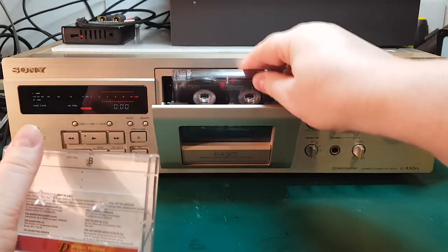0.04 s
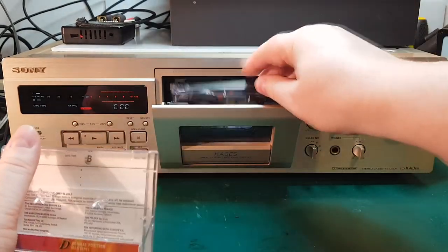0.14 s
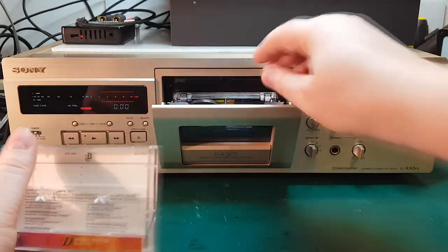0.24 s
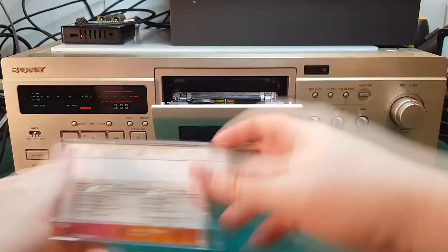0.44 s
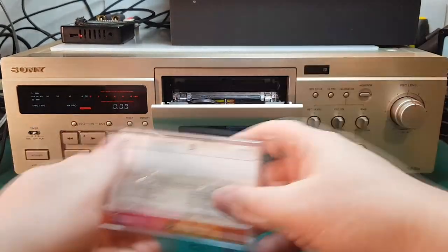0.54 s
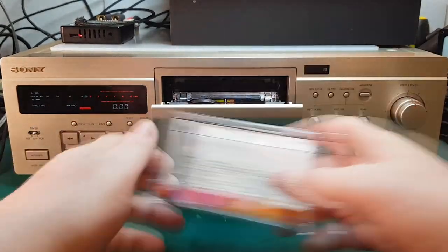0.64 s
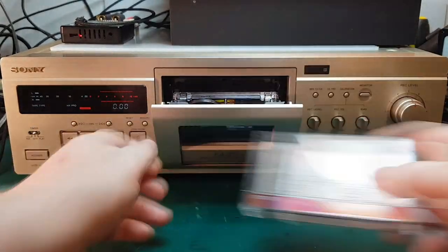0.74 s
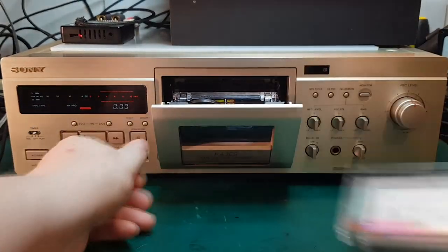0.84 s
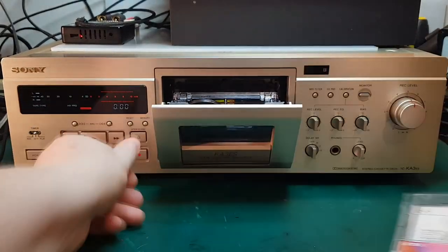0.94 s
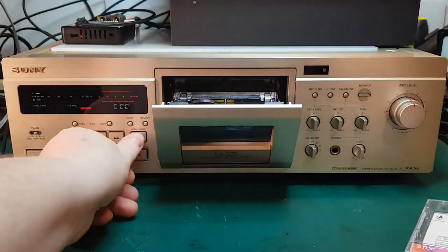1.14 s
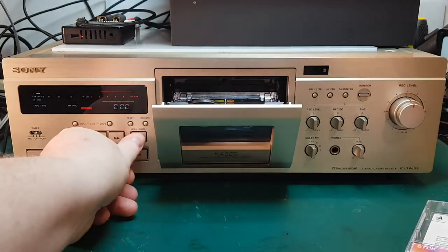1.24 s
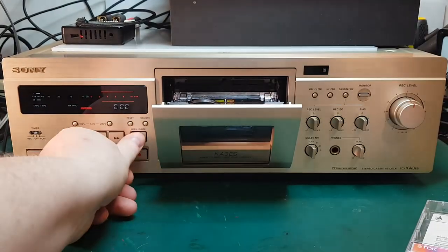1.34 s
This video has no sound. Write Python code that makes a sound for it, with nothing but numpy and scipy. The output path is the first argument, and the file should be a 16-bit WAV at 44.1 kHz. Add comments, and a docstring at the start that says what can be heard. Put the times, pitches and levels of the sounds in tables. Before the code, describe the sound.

Close microphone in a small, quietly humming room: short scrape and sharp clunk of a cassette seating in a tape deck, tiny settling taps, a lighter plastic case knock, then a very faint button click.

```python
"""Cassette into a deck

A cassette slides into the open holder of a tape deck, drops home with a clunk and settles with small taps.
Its empty plastic case is laid on the table, then a finger presses a button. Small room, low hum of the house.
Impacts ring damped modes and add noisy cracks; rubbing is dense random slips through resonances.
Room and hum are noise shaped in bands.
"""
import sys
import numpy as np
from scipy import signal
from scipy.io import wavfile

SR = 44100
rng = np.random.default_rng(int(sys.argv[2]) if len(sys.argv) > 2 else 0)


def put_to_file(sound):
    """Save the sound as 16-bit audio at rate SR, in the file named by the first command-line argument."""
    columns = np.atleast_2d(sound).T  # one column per channel
    safe = np.clip(columns, -1, 1)
    whole_steps = np.round(safe * 32767)
    wavfile.write(sys.argv[1], SR, whole_steps.astype(np.int16))


def invert_db(level):
    """Linear amplitude ratio for a level in decibels (20 dB per decade), elementwise."""
    return 10 ** (np.asarray(level, dtype=float) / 20)


N = 61739


def rms_one(x):
    """Scale to unit rms."""
    return x / np.sqrt(np.mean(x ** 2) + 1e-20)


def band(x, low_hz, high_hz):
    """Butterworth band-pass."""
    sos = signal.butter(2, [low_hz, high_hz], "band", fs=SR, output="sos")
    return signal.sosfilt(sos, x)


def resonance(x, hz, width_hz):
    """Two-pole resonance, gain about 1 on top."""
    r = np.exp(-np.pi * width_hz / SR)
    poles = [1, -2 * r * np.cos(2 * np.pi * hz / SR), r * r]
    return signal.lfilter(np.array([1, 0, -1]) * (1 - r * r) / 2, poles, x)


def ring(clicks, hz, t60_s):
    """Damped mode: a unit click starts a decaying sine of height 1."""
    r, w = invert_db(-60 / (t60_s * SR)), 2 * np.pi * hz / SR
    return signal.lfilter([0, np.sin(w)], [1, -2 * r * np.cos(w), r * r], clicks + 1e-18)


def smooth(x, time_s):
    """One-pole low-pass with unit gain at DC."""
    keep = np.exp(-1 / (time_s * SR))
    return signal.lfilter([1 - keep], [1, -keep], x)


def drift(rate_hz):
    """Slow random wander, unit rms: noise through a double pole."""
    r = np.exp(-2 * np.pi * rate_hz / SR)
    return rms_one(signal.lfilter([1], [1, -2 * r, r * r], rng.standard_normal(N + SR))[SR:])


def convolve(x, h):
    """Fast convolution cut to length."""
    return signal.fftconvolve(x, h)[:N]


def at_band(low_hz, high_hz, table_hz, values):
    """Read a table at the band centre, on a log frequency axis."""
    return np.interp(np.log(low_hz * high_hz) / 2, np.log(table_hz), values)


def mode_ringing(at, level_db, treble_db, modes):
    """Each hit excites each mode with its own random strength, softened by contact time."""
    treble_from_hz, scatter_db = 1700, 2.0
    chance = rng.standard_normal((len(at), len(modes)))
    out = np.zeros(N)
    for k, (hz, mode_db, t60_s) in enumerate(modes):
        hit_db = level_db + mode_db + treble_db * (hz > treble_from_hz)
        clicks = np.zeros(N)
        clicks[at] = invert_db(hit_db + scatter_db * chance[:, k]) * (-1) ** k
        out += ring(clicks, hz, t60_s)
    contact = np.hanning(8)  # samples
    return band(convolve(out, contact / contact.sum()), 200, SR / 4)


def crack_noise(at, level_db, treble_db, crack):
    """Each hit starts a short decaying noise, coloured in third octaves."""
    t60_s, rise_s = .016, .0008
    clicks = np.zeros(N)
    clicks[at] = invert_db(level_db + treble_db)
    decay = signal.lfilter([1], [1, -invert_db(-60 / (t60_s * SR))], clicks + 1e-18)
    burst = smooth(decay, rise_s) * rng.standard_normal((2, N))
    table_hz, crack_db = np.transpose(crack)
    edges_hz = 1200 * 2 ** (np.arange(13) / 3)
    out = np.zeros(N)
    for k, (low, high) in enumerate(zip(edges_hz, edges_hz[1:])):
        even_power = np.sqrt(SR / 2 / (high - low))
        out += invert_db(at_band(low, high, table_hz, crack_db)) * even_power * band(burst[k % 2], low, high)
    return out


def struck(hits, modes, crack):
    """Struck body: modal ringing plus a noisy crack at every hit."""
    start_s, level_db, treble_db = np.transpose(hits)
    at = (start_s * SR).astype(int)
    return mode_ringing(at, level_db, treble_db, modes) + crack_noise(at, level_db, treble_db, crack)


def rubbing(curve, bands):
    """Friction-like noise: dense tiny slips through broad resonances, under a level curve."""
    slips_per_s, mean_extra_db = 16000, 1.5
    happens = rng.random(N) < slips_per_s / SR
    slips = happens * invert_db(mean_extra_db * rng.exponential(1, N)) * rng.choice([-1, 1], N)
    shell = 0
    for hz, width_hz, level_db in bands:
        twice = resonance(resonance(slips, hz, width_hz), hz, width_hz)
        shell = shell + invert_db(level_db) * rms_one(twice)
    time_s, curve_db = np.transpose(curve)
    return invert_db(np.interp(np.arange(N) / SR, time_s, curve_db, left=-140)) * rms_one(shell)


# cassette touches the holder: start_s, level_db, treble_db
CASSETTE_HITS = [(.001, -60, 7.5), (.007, -65.5, 7.5), (.1908, -33, -7.5), (.1944, -35.5, -1.5),
                 (.2025, -39, 2), (.211, -41, -2.5), (.221, -46, -3.5), (.2255, -47, 2.5),
                 (.2418, -17, 4.5), (.2454, -19.5, 5), (.249, -23.5, 0), (.2517, -18, -1.5),
                 (.2575, -36.5, 2), (.279, -40.5, -5), (.5965, -57, 1), (.6011, -43.5, -17),
                 (.6565, -57.5, -15)]
# cassette and holder modes: pitch_hz, level_db, t60_s
HOLDER_MODES = [(511, -13.5, .03), (583, -12, 0.073), (648, -19.5, 0.11), (750, -13.5, 0.057),
                (909, -11.5, 0.045), (949, -1.5, 0.05), (1083, 7.5, 0.018), (1156, -3.5, 0.077),
                (1292, -13.5, 0.1), (1548, -18, 0.06), (1860, -20.5, 0.03), (2250, -27, 0.018),
                (3520, -18.5, .03), (3840, -26.5, .08), (4646, -19, .03)]
# holder crack colour: centre_hz, band_level_db
HOLDER_CRACK = [(1400, -16), (1800, -18), (2600, -22.5), (3400, -18.5), (4500, -20), (6000, -20.5),
                (8000, -34), (10000, -19), (12000, -51.5), (15000, -56.5)]


def cassette():
    """Cassette against holder: struck plastic modes and cracks."""
    return struck(CASSETTE_HITS, HOLDER_MODES, HOLDER_CRACK)


# deck chassis modes: pitch_hz, level_db, t60_s
CHASSIS_MODES = [(153, -42.5, 0.31), (189.6, -26.5, 0.21), (239, -50, 0.99), (357, -55, 1)]


def chassis():
    """The landing gives the low deck modes one soft push; the sheet-metal cover rings on faintly."""
    landing_s = .257
    click, push = np.zeros(N), np.hanning(85)  # push in samples
    click[int(landing_s * SR)] = 1
    soft = convolve(click, push / push.sum())
    low = band(sum(invert_db(db) * ring(soft, hz, t60_s) for hz, db, t60_s in CHASSIS_MODES), 100, 800)
    cover = invert_db(-50) * ring(click, 558, 1.0)
    damped_s, fade_s = .6, .03  # a late tap of the cassette stills the cover
    return low + cover * np.exp(-np.maximum(np.arange(N) / SR - damped_s, 0) / fade_s)


# cassette rubs down the guides: time_s, level_db
SLIDE = [(.135, -87), (.158, -67.5), (0.187, -62.5), (.198, -58), (0.227, -64), (.24, -97.5), (.245, -100),
         (0.601, -100), (.64, -87.5), (.665, -78), (0.712, -123)]
# slide resonances: pitch_hz, pole_width_hz, level_db
SLIDE_BANDS = [(2130, 810, -8.5), (3670, 300, -8.5), (4500, 890, 5), (5460, 1100, 1.5), (9300, 1500, -9)]


def slide():
    """Cassette on its guides: friction slips, faded out after the last point."""
    end = (SLIDE[-1][0] + 0.045, -140)
    return rubbing(SLIDE + [end], SLIDE_BANDS)


# case meets the table: start_s, level_db, treble_db
CASE_HITS = [(1.0042, -27, 5), (1.0062, -45, -9), (1.0082, -33.5, 5.5), (1.012, -68, -3),
             (1.021, -45.5, -16)]
# case modes: pitch_hz, level_db, t60_s
CASE_MODES = [(414, -22.5, 0.018), (610, -21, 0.022), (726, -17.5, 0.0075), (1012, 0, 0.027),
              (1213, -16.5, 0.11), (1320, -24.5, 0.27), (1605, -19, 0.28), (2104, -13.5, 0.056),
              (2750, -30.5, 0.17), (2972, -28.5, 0.18), (3723, -31, 0.16), (4283, -33.5, 0.16),
              (5200, -53, 0.019), (5870, -11, 0.027)]
# case crack colour: centre_hz, band_level_db
CASE_CRACK = [(1400, -13), (2000, -16), (2800, -20), (4000, -20), (5800, -14.5), (8000, -25), (11000, -30),
              (12500, -56), (15000, -60)]


def case():
    """Empty case laid on the table: struck plastic modes and cracks."""
    return struck(CASE_HITS, CASE_MODES, CASE_CRACK)


# button travel and switch click: start_s, level_db, treble_db
BUTTON_HITS = [(1.274, -73, -9), (1.3145, -56, -39), (1.3657, -61.5, 5), (1.373, -62, -1)]
# button modes: pitch_hz, level_db, t60_s
BUTTON_MODES = [(356, -32.5, 0.016), (750, -2, 0.049), (1072, 6.5, 0.016), (1344, 3, 0.028),
                (1940, -1.5, 0.067), (3300, -11, .04)]
# button crack colour: centre_hz, band_level_db
BUTTON_CRACK = [(1400, 4), (2000, -1.5), (3200, -11), (5700, -8.5), (8500, -23), (14000, -39)]


def button():
    """Button travel and switch click: struck modes and cracks."""
    return struck(BUTTON_HITS, BUTTON_MODES, BUTTON_CRACK)


# small springs: start_s, level_db, pitch_hz, t60_s
PINGS = [(0.598, -76.5, 3440, .1), (.66, -87, 3400, 0.33), (1.3156, -81.5, 3570, 0.029)]


def pings():
    """Small springs: each ping is one thin tone dying away."""
    return sum(invert_db(db) * ring(np.arange(N) == int(s * SR), hz, t60_s) for s, db, hz, t60_s in PINGS)


# dull mid-band noise, before the band-pass: time_s, level_db
DULL_NOISE = [(0, -48.5), (.04, -76.5), (.1, -63.5), (.18, -67.5), (.2, -41.5), (.235, -49), (.25, -87),
              (.55, -80), (.58, -76.5), (.64, -84), (.66, -80), (.72, -74), (.8, -99), (.86, -93),
              (.88, -76), (.92, -81), (1.26, -74), (1.33, -78.5), (1.4, -66)]
# dull noise resonances: pitch_hz, pole_width_hz, level_db
DULL_NOISE_BANDS = [(599, 540, 4.5), (994, 390, -1.5), (1080, 190, -1), (1460, 420, -14.5)]


def dull_noise():
    """Dull mid-band noise, swelling around the landing; faint handling noise elsewhere. Band-passed slips."""
    return band(rubbing(DULL_NOISE, DULL_NOISE_BANDS), 220, 1500)


# room tail: centre_hz, level_db, t60_s
ROOM = [(328, -28.5, 0.5), (540, -30.5, 0.17), (1080, -47, 0.38), (2270, -33.5, 0.29), (3700, -39, 0.33),
        (7500, -40, 0.32), (11200, -39.5, 0.38)]


def room(x):
    """Diffuse reflections: per sixth octave, noise carries the arrived energy and dies at its own pace."""
    build_s = 0.0016
    table_hz, table_db, table_t60_s = np.transpose(ROOM)
    edges_hz = 230 * 2 ** (np.arange(37) / 6)
    white, out = rng.standard_normal((2, N)), 0
    for k, (low, high) in enumerate(zip(edges_hz, edges_hz[1:])):
        level_db = at_band(low, high, table_hz, table_db)
        t60_s = at_band(low, high, table_hz, table_t60_s)
        fall = invert_db(-120 / (t60_s * SR))  # of energy, hence 120
        energy = signal.lfilter([1], [1, -fall], band(x, low, high) ** 2 + 1e-18)
        carrier = rms_one(band(white[k % 2], low, high))
        out = out + invert_db(level_db) * np.sqrt(smooth(energy, build_s)) * carrier
    return out


# background spectrum, relative: centre_hz, level_db_per_hz
HUM = [(15, -44), (25, -23), (60, -3.5), (90, -2), (130, -11), (200, -8.5), (330, -15.5), (600, -34.5),
       (900, -36.5), (1300, -43.5), (1700, -60.5), (2500, -60), (3500, -57.5), (6500, -47.5), (9500, -50.5),
       (12500, -62), (15500, -78.5)]


def hum():
    """House hum: third-octave noise bands that flicker a little, plus a low wavering narrow-band tone."""
    noise_db, flicker_db, flicker_hz = -58, 1, 2.1
    tone_hz, half_width_hz, tone_db = 97, 14, -63
    table_hz, table_db = np.transpose(HUM)
    edges_hz = 22 * 2 ** (np.arange(30) / 3)
    white, noise = rng.standard_normal((2, N + SR)), 0  # first second lets the filters settle
    for k, (low, high) in enumerate(zip(edges_hz, edges_hz[1:])):
        level_db = at_band(low, high, table_hz, table_db) + flicker_db * drift(flicker_hz)
        noise = noise + invert_db(level_db) * band(band(white[k % 2], low, high), low, high)[SR:]
    narrow = band(white[0], tone_hz - half_width_hz, tone_hz + half_width_hz)
    tone = band(narrow, tone_hz / 2, tone_hz * 2)[SR:]
    return invert_db(noise_db) * rms_one(noise) + invert_db(tone_db) * rms_one(tone)


def scene():
    """Near sources with their room tail, plus chassis and hum without one."""
    near = cassette() + slide() + case() + button() + pings() + dull_noise()
    return (near + room(near) + chassis() + hum())[None]


def roll_off(x):
    """The treble ends steeply here."""
    return signal.sosfilt(signal.butter(12, 15780, fs=SR, output="sos"), x)


def record(dry):
    """Steep low-pass cuts the top of the mix."""
    low_pass = signal.cheby2(12, 60, 15780, fs=SR, output="sos")  # order, stop-band dB, stop-band Hz
    mix = signal.sosfilt(low_pass, dry)
    return roll_off(mix)


dry = scene()
out = record(dry)
put_to_file(out)
```